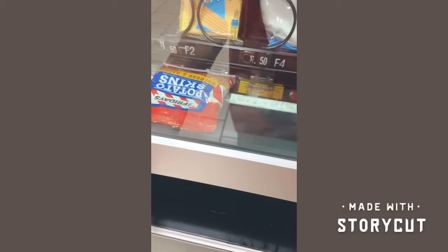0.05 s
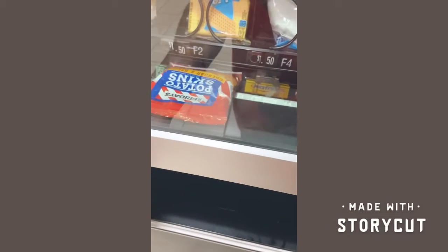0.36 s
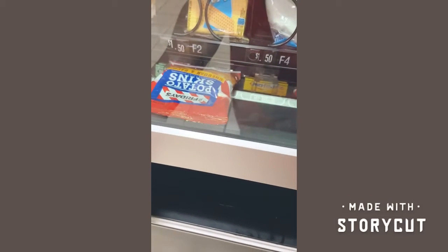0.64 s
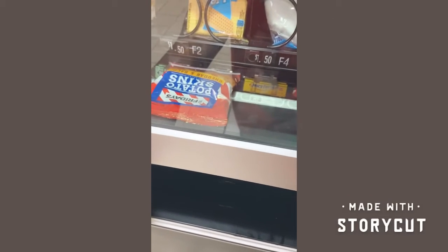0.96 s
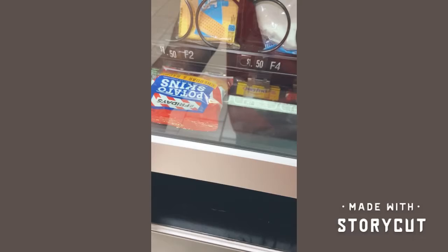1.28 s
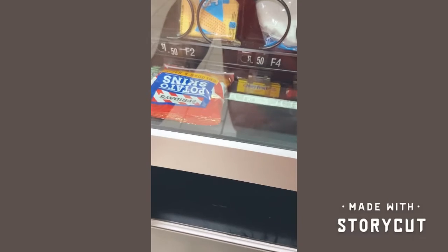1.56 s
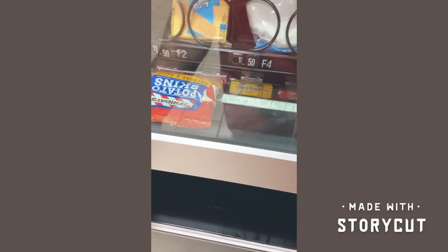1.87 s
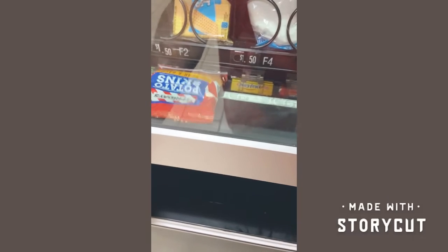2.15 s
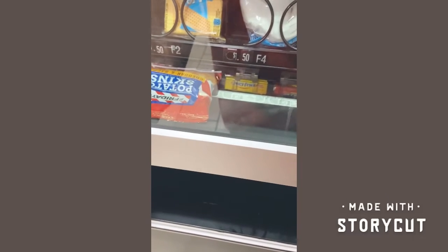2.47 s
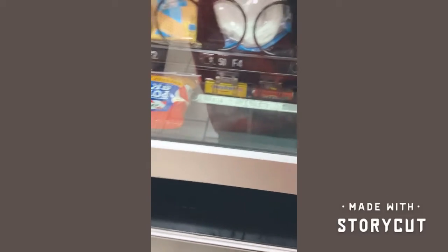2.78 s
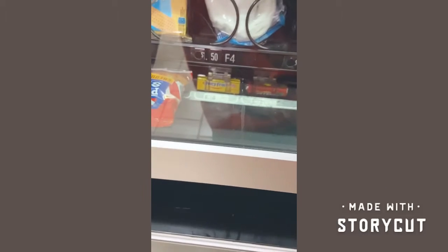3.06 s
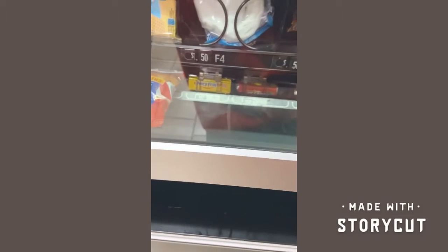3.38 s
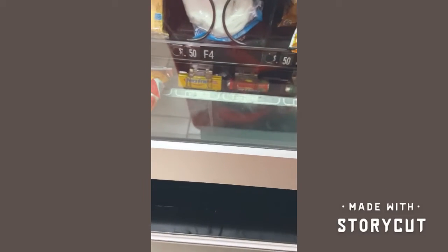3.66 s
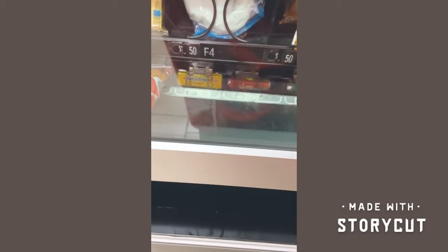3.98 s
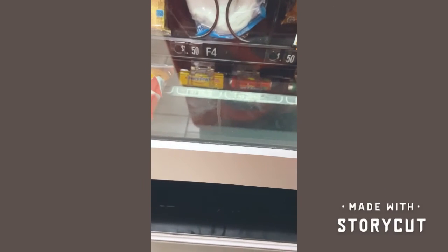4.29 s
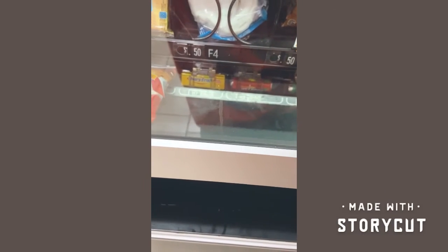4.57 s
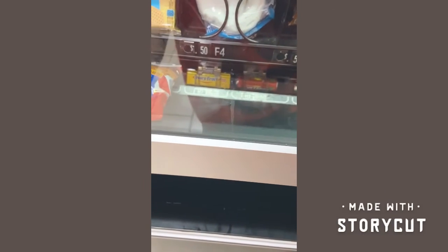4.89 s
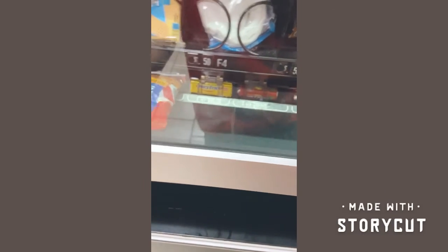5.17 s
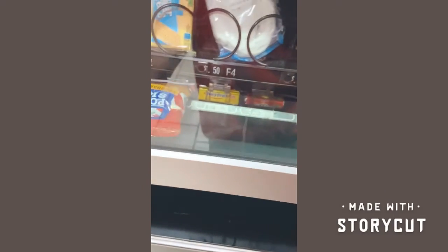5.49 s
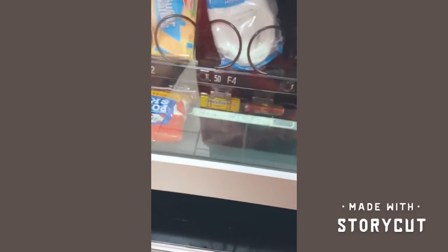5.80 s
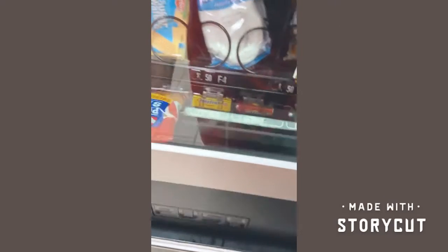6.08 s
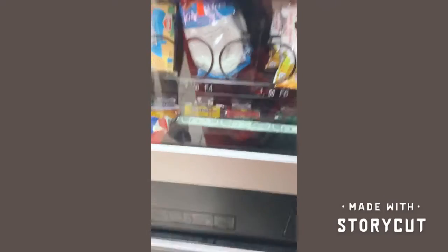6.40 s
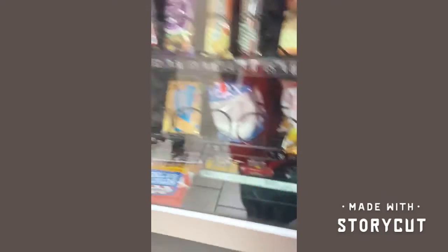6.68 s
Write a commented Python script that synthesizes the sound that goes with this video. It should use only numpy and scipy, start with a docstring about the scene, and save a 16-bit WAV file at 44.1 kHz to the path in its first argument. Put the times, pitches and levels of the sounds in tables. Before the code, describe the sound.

A snack vending machine hums steadily close to the microphone. Its delivery flap is shoved three times, each push rumbling the steel cabinet and ending in a hollow slam and rebound. Light knocks and short, shrill hinge squeaks fall in between. After a quieter stretch, four quicker shoves follow, the last booming in the bin with a faint wire ring. The hum eases under a soft handling rumble.

```python
"""A snack vending machine hums; its delivery flap is shoved three times (0.2-2.3 s), close to the mic.
Each shove rumbles the steel cabinet, scrapes the flap, slams it against its stop and lets it rebound.
In between, the loose flap knocks lightly and the dry hinge squeals and creaks.
Four quicker shoves follow (5.2-6.4 s); the last booms in the bin and leaves a wire spiral singing.
The hum fades at the end as the mic is lifted away with a soft rumble."""
import sys
import numpy as np
from scipy import signal
from scipy.fft import rfft, irfft, next_fast_len
from scipy.io import wavfile
from scipy.ndimage import uniform_filter1d

SR = 44100
rng = np.random.default_rng(int(sys.argv[2]) if len(sys.argv) > 2 else 0)


def unload_audio(sound):
    """Save the sound as a 16-bit wav file, at the path given as the first command line argument."""
    columns = np.transpose(np.atleast_2d(sound))
    # keep every value between -1 and 1, then stretch to whole-number steps
    steps = np.round(np.clip(columns, -1, 1) * 32767)
    wavfile.write(sys.argv[1], SR, steps.astype(np.int16))


N = 306230
TIME_S = np.arange(N) / SR
FFT_SIZE = next_fast_len(N + SR)
FREQ_HZ = np.fft.rfftfreq(FFT_SIZE, 1 / SR)
QUADRATURE_RAD = np.array([[0], [np.pi / 2]])

# flap shoves (push [s], slam [s], rebound [s], push [dB], scrape [dB], slam [dB], rebound [dB], thud [dB], snap
# [dB], crack [dB], slam hold [s], slam spot [Hz], rebound spot [Hz])
SHOVES = [(0.22, 0.4525, 0.517, -29.5, -48.5, -6, -12, -1, -0.5, 0, 0.014, 923, 1930),
          (1.412, 1.6291, 1.689, -30.5, -44, -11, -15.5, 1, -0.5, 0, 0.022, 1115, 2780),
          (2.115, 2.272, 2.34, -30, -49.5, -9.5, -15.5, -1, -0.5, 1, 0.014, 2670, 1500),
          (5.237, 5.328, 5.406, -24, -30, -8.5, -21.5, -0.5, 0.5, 2, 0.011, 1320, 2510),
          (5.575, 5.669, 5.745, -28, -27, -7.5, -27.5, 0, -1.5, 2.5, 0.012, 1600, 2700),
          (5.876, 5.944, 6.026, -30, -31, -10.5, -29.5, -0.5, -2, 1.5, 0.013, 3550, 2500),
          (6.269, 6.325, 6.369, -43.5, -33.5, -14, -17.5, -5, -0.5, 10.5, .012, 3570, 3550)]


def flap():
    """Blows and dragging drive deep cabinet modes, the flap's modes and a bright crack in the trim."""
    # resonances (frequency [Hz], width [Hz], level [dB])
    cabinet_modes = [(69, 36, -10.5), (112.4, 12, -1), (160.3, 24, -3), (217, 34, 1), (241, 36, -1.5),
                     (260.5, 28, -2.5), (306, 17, -9.5)]
    flap_modes = [(554, 35, -5), (684, 40, 2), (790, 50, -6), (860, 60, 1), (930, 50, -5), (1190, 70, -3),
                  (1380, 100, 4), (1540, 70, -1), (1760, 60, -7), (1965, 70, 4), (2150, 50, -6),
                  (2490, 80, -2), (2720, 100, 2), (3130, 75, -0.5)]
    trim_modes = [(3590, 250, 6), (4060, 110, 4.5), (4700, 120, 6.5), (4920, 130, 10), (5260, 150, 11),
                  (5745, 220, 11), (6150, 100, 6), (6260, 70, 7.5), (8400, 250, 5), (9250, 320, 0.5)]
    # broad spectra of flap and trim (frequency [Hz], level [dB])
    clack_spectrum = [(250, -24), (470, -13), (660, 0), (1000, -1), (1400, -3), (2300, -0.5), (3200, -1),
                      (4000, -16), (6000, -43.5)]
    crack_spectrum = [(1500, -95.5), (2900, -51.5), (3500, 0.5), (4400, 2), (5700, 5), (6500, 3.5),
                      (7200, 2), (8400, 4.5), (9600, -5.5), (14000, -43.5)]
    thud, clack, snap, crack = flap_forces()
    # big panels follow only slow forces
    heavy = colour([(25, -21), (60, 4.5), (300, -4.5), (450, -16), (1000, -35.5)])
    cabinet = ringing(cabinet_modes) * heavy
    flap_peaks = abs(ringing(flap_modes)) * amp(curve([(250, -20), (500, 0), (3200, 0), (6000, -18)]))
    plate = causal(np.hypot(flap_peaks, amp(curve(clack_spectrum))))
    trim_peaks = abs(ringing(trim_modes)) * amp(curve([(2000, -38.5), (3400, -4)]))
    trim = causal(np.hypot(trim_peaks, amp(curve(crack_spectrum))))
    soft = 1 / (1 + (FREQ_HZ / 1600) ** 10)  # soft blows reach only the lower modes
    plate_sound = through(clack, unit(plate * soft)) + through(snap, unit(plate * (1 - soft)))
    return through(thud, unit(cabinet)) + plate_sound + through(crack, unit(trim))


def flap_forces():
    """Push, swing, slam and rebound of each shove, plus light knocks, in four force bands."""
    # loose flap knocks (time [s], level [dB], thud [dB], snap [dB], crack [dB], spot [Hz], rise [s])
    knocks = [(0.149, -52, -4, -3, 2.5, 3600, .003), (0.2, -40, 7.5, -9, 1, 660, .007),
              (0.378, -42, -7.5, 2.5, -3, 2300, .007), (0.668, -35.5, 4, -2, -2, 680, 0.011),
              (0.705, -29, 0, -5.5, -6.5, 1320, .009), (0.789, -34, 2, -4, -3.5, 1960, 0.0095),
              (1.74, -29.5, -6.5, -8, -16, 1350, .006), (1.812, -39, -1, -4, -8, 1710, .006),
              (1.9, -37, 4.5, -4.5, -3, 900, .007), (2.205, -43.5, 0, -1, -10, 1960, .007),
              (2.455, -35.5, 4, -3.5, -7.5, 1490, 0.0076), (2.51, -43, -2.5, -4, -9, 1490, 0.0064),
              (2.61, -41.5, 5, -9, -16, 580, .007), (2.725, -47.5, 9.5, -5, -3, 1380, .007),
              (2.812, -27.5, -2, -0.5, -11, 1830, .004), (2.877, -32, 1, -20, -17, 860, .003),
              (3.875, -40, -2, -0.5, -3.5, 1100, .004), (3.905, -42, -2, -3.5, -6, 1290, .007),
              (3.975, -46, -1, -3, -11, 1000, .006), (4.295, -38.5, -3.5, -16, -8, 990, 0.0077),
              (4.58, -46, 7.5, -15, -12, 900, .012), (4.76, -52, -8, 2.5, 12.5, 3480, .004),
              (5.208, -45, 9, -9, -1, 900, .012), (5.474, -43.5, 2.5, -5, 15.5, 3700, .003),
              (5.538, -37.5, 6, -1, 5, 680, .003), (5.579, -28, -3, -2.5, 1.5, 700, .002),
              (5.626, -28, -1, -5, 3, 2740, 0.0053), (6.085, -46, 3.5, -4, 11.5, 3700, .004),
              (6.125, -36.5, 1, -3.5, 1.5, 1140, 0.0076), (6.161, -31.5, -1, -3, -0.5, 634, 0.0088),
              (6.228, -47.5, 5, -1, 4.5, 5350, .003), (6.414, -29.5, -6, 3, 9, 3320, 0.0033),
              (6.594, -33, -5, -3.5, 8, 550, .002), (6.609, -35, -3.5, -2, -1, 795, .005),
              (6.685, -41, -1.5, -1, 4, 550, .002), (6.754, -37.5, -20, -1.5, 4, 2300, .002)]
    push = dict(spot_hz=670, rise_s=0.0089, hold_s=0.004, t60_s=0.2, thud_db=6.5, crack_db=1)
    slam = dict(rise_s=0.002, t60_s=0.073, thud_db=-4, crack_db=-1.5, thud_delay_s=0.004)
    rebound = dict(rise_s=0.01, hold_s=0.011, t60_s=0.087, thud_db=-1.5, crack_db=-3)
    knock = dict(hold_s=0.0045, t60_s=0.14, thud_db=5.5, crack_db=-1)
    force = np.zeros((4, 2, N))
    for (push_s, slam_s, rebound_s, push_db, scrape_db, slam_db, rebound_db,
         *tone_db, slam_hold_s, slam_hz, rebound_hz) in SHOVES:
        add(force, push_s, blow(push_db, tone_db, **push))
        add(force, *swing(push_s, slam_s, scrape_db, thud_db=tone_db[0]))
        add(force, slam_s, blow(slam_db, tone_db, slam_hz, hold_s=slam_hold_s, **slam))
        add(force, rebound_s, blow(rebound_db, tone_db, rebound_hz, **rebound))
    for start_s, db, *tone_db, spot_hz, rise_s in knocks:
        add(force, start_s, blow(db, tone_db, spot_hz, rise_s, **knock))
    return force


def blow(db, tone_db, spot_hz, rise_s, hold_s, t60_s, thud_db, crack_db, thud_delay_s=0):
    """Force of one blow as thud, clack, snap and crack (low to high), favouring the struck spot's ring."""
    spot_db, spot_width_hz = 5, 190
    t = np.arange(SR // 3) / SR
    thud_age = np.maximum(t - thud_delay_s, 0) / 1.69  # the heavy cabinet responds more slowly
    age = np.array([thud_age, t, t, t])[:, None]
    envelope = np.minimum(age / rise_s, 1) * amp(db - 60 * np.maximum(age - hold_s, 0) / t60_s)
    thud, snap, crack = tone_db
    shares = amp([thud_db + thud, -0.8, snap - 0.4, crack_db + crack])
    force = shares[:, None, None] * envelope * chatter(t, grain_db=3.5)
    spot = signal.lfilter(*signal.iirpeak(spot_hz, spot_hz / spot_width_hz, fs=SR), force)
    return force + (amp(spot_db) - 1) * spot


def swing(push_s, slam_s, scrape_db, thud_db):
    """Start and force of a swing: the flap scrapes, the cabinet rumbles, loose goods rattle."""
    brush_s, free_s = 0.03, 0.012  # hand contact before the push; free flight before the slam
    settle_s, settle_db_per_s = 0.62, 11
    swell_db, fade_db_per_s = 5.5, 105  # the scrape grows with speed, dies after the slam
    travel_s = slam_s - push_s
    t = np.arange(-brush_s, travel_s + settle_s, 1 / SR)
    after_s = np.maximum(t - travel_s, 0)
    contact = np.interp(t, [t[0], 0, t[-1] - 0.05, t[-1]], [0, 1, 1, 0]) ** 2
    rumble = amp(-38 + thud_db - settle_db_per_s * after_s)
    scrape = amp(scrape_db + swell_db * np.minimum(t / travel_s, 1) - fade_db_per_s * after_s)
    scrape *= amp(np.interp(t - travel_s, [-2 * free_s, -free_s, 0, free_s], [0, -4, -4, 0]))
    envelopes = np.array([rumble, scrape * amp(-7), scrape * amp(-8), scrape * amp(-8.5)])
    drag = envelopes[:, None] * chatter(t, grain_db=2.5)
    drag[1:] *= unit(amp(3.5 * drift(len(t), rate_hz=130)))  # stick-slip spurts
    ticks = rumble * amp(-10) * loose_goods(t) * chatter(t, grain_db=2.5)
    rattle = np.array([0, 1, amp(-7.5), amp(-10)])[:, None, None] * ticks
    return push_s - brush_s, (drag + rattle) * contact


def chatter(t, grain_db):
    """Loose parts strike each other many times: dense clicks of uneven size."""
    sizes = amp(grain_db * drift(len(t), 900))
    return unit(sizes * rng.standard_normal((2, 2 * SR))[:, :len(t)])


def loose_goods(t, ticks_per_s=55, decay_s=0.0036, spread_db=13):
    """Envelope of short contacts of uneven size at random moments."""
    chance, size = rng.random((2, 2 * SR))[:, :len(t)]
    impulses = (chance < ticks_per_s / SR) * amp(spread_db * size)
    return unit(signal.lfilter([1], [1, -np.exp(-1 / (decay_s * SR))], impulses))


def panel_ring(rise_s=0.006, spread_db=1.5):
    """Each slam rings the flap and front panel: a hollow clack with a thin metallic tail."""
    # panel modes (frequency [Hz], level re slam [dB], t60 [s])
    modes = [(553, -16.5, .2), (683, -11, 0.15), (940, -18, 0.14), (655, -20, 0.38), (867, -12.5, .14),
             (1232, -16.5, .4), (1378, -7.5, 0.14), (1554, -13.5, .22), (1954, -10, 0.14),
             (2060, -25.5, 0.45), (2172, -22, .35), (2470, -17.5, 0.37), (2730, -13.5, 0.14),
             (3120, -17.5, .26), (4760, -23.5, .2)]
    sound, t = np.zeros((2, N)), np.arange(SR // 2) / SR
    attack = np.minimum(t / rise_s, 1)
    for _, slam_s, _, _, _, slam_db, *_ in SHOVES:
        for hz, db, t60_s in modes:
            decay = amp(slam_db + db + spread_db * rng.standard_normal() - 60 * t / t60_s)
            phase = 2 * np.pi * (hz * t + rng.random((2, 1)))
            add(sound, slam_s, attack * decay * np.sin(phase))
    return sound


def panel_bumps():
    """A firm push or slam flexes a broad steel panel, which answers with one rounded bump."""
    # flexes (time [s], pitch [Hz], level [dB], swell [s])
    flexes = [(0.222, 278, -24.5, 0.015), (0.453, 256, -23, 0.024), (0.458, 146, -24, .016),
              (0.685, 247.6, -24, .02), (0.785, 276.6, -27.5, .022), (1.411, 255.4, -26, .018),
              (1.632, 229, -12, .017), (2.112, 289, -26.5, 0.022), (2.272, 216, -22, 0.019),
              (5.234, 269.3, -20.5, 0.026), (5.329, 248.4, -19.5, .02), (5.574, 277, -22, 0.016),
              (5.668, 217.4, -19, 0.018), (5.875, 236, -24, .016), (5.945, 257, -18, 0.016),
              (6.18, 168, -25.5, .015), (6.326, 308, -22.5, .01), (6.372, 161, -19.5, 0.02),
              (6.374, 56.3, -23, .012)]
    sound, t = np.zeros((2, N)), np.arange(SR // 3) / SR
    for start_s, hz, db, swell_s in flexes:
        age = t / swell_s
        add(sound, start_s, amp(db) * age * np.exp(1 - age) * np.sin(2 * np.pi * hz * t))
    return sound


def bin_boom():
    """The air and sheet metal of the hollow bin take up the last slam and its rebound."""
    # blows to the bin (time [s], level [dB], t60 [s])
    booms = [(6.329, -12.5, 0.2), (6.369, -9.5, 0.084)]
    # bin modes (frequency [Hz], width [Hz], level [dB])
    modes = [(58, 30, -8), (162, 28, 6), (268, 42, -2.5), (332, 33, 4.5), (374, 27, -5), (566, 150, -3.5)]
    force, t = np.zeros((2, N)), np.arange(SR // 3) / SR
    for start_s, db, t60_s in booms:
        add(force, start_s, amp(db - 60 * t / t60_s) * chatter(t, grain_db=4))
    body = ringing(modes) * colour([(20, -13), (50, 4), (550, 0), (1200, -20)])
    return through(force, unit(body))


def wire_spiral(start_s=6.375, hz=2350, db=-38, t60_s=0.9):
    """The last slam leaves a wire spiral singing."""
    t = np.maximum(TIME_S - start_s, 0)
    return amp(db - 60 * t / t60_s) * np.sin(2 * np.pi * hz * t)


def hinge_squeals():
    """Stick and slip: a thin gliding tone that turns to a scrape when the slips are uneven."""
    # (time [s], length [s], pitch [Hz], glide [Hz], jitter [Hz], roughness [0-1], level [dB])
    squeals = [(0.289, 0.13, 9620, -380, 65, 0.23, -31), (0.38, 0.12, 9570, 352, 76, 0.27, -31),
               (0.908, 0.054, 4290, 0, 30, .35, -30), (0.912, 0.04, 9205, 0, 30, 0, -25.5),
               (0.921, 0.031, 5110, -60, 50, .25, -26), (1.48, 0.11, 9600, -350, 80, 0.4, -32),
               (1.553, 0.034, 4180, -58, 30.4, 0, -28.5), (1.995, 0.046, 4340, -2, 35, 0.32, -30),
               (2.0, 0.057, 9270, 60, 55, .5, -29.5), (2.141, 0.076, 9640, 0, 36, 0, -38.5),
               (2.199, 0.024, 4300, 4, 30.1, .3, -43.5), (3.547, 0.05, 4990, 50, 40, 0.27, -28),
               (3.55, 0.049, 9507, -1, 25, .25, -40), (3.547, 0.072, 870, -12, 12, .3, -43),
               (3.555, 0.055, 1640, 2, 30, .4, -52), (5.252, 0.075, 2080, -260, 130, .8, -21),
               (5.902, 0.042, 2590, -120, 90, .8, -34)]
    sound = np.zeros((2, N))
    for start_s, length_s, hz, glide_hz, jitter_hz, rough, db in squeals:
        envelope = hinge_grip(length_s, db)
        count = len(envelope)
        pitch_hz = hz + glide_hz * np.linspace(-0.5, 0.5, count) + jitter_hz * drift(count, 700)
        phase = 2 * np.pi * np.cumsum(pitch_hz) / SR + QUADRATURE_RAD
        uneven = unit(1 - rough + rough * (drift(count, 350) + 1j * drift(count, 350)))
        add(sound, start_s, envelope * np.sqrt(2) * (uneven * np.exp(1j * phase)).imag)
    return sound


def hinge_creaks(rasp_db=-6, fade_db=11):
    """Irregular slips bite hard and ease off, ringing the hinge's modes over a dry rasp."""
    # (time [s], length [s], level [dB], main mode [Hz], width [Hz], side modes re level [dB])
    creaks = [(0.912, 0.068, -30.5, 4860, 180, -3), (1.996, 0.085, -30.5, 5000, 200, -2),
              (3.546, 0.076, -35.5, 5050, 200, -1.5)]
    # hinge side modes (frequency [Hz], width [Hz], level [dB])
    side_modes = [(3590, 50, -8), (4070, 50, -2), (4320, 70, 3), (4785, 50, 1), (5410, 60, -5),
                  (5650, 90, -6), (8480, 80, -3.5), (8600, 80, -4), (8900, 80, -4), (9200, 110, 0),
                  (9400, 60, -4)]
    # dry friction (frequency [Hz], level [dB])
    rasp_spectrum = [(2500, -15), (3800, -14), (4300, -18), (5100, -8), (5700, -0.5), (6400, -15),
                     (7300, -20.5), (8400, 6), (9500, -9), (12000, -17.5)]
    rasp = amp(rasp_db) * unit(colour(rasp_spectrum))
    side = unit(ringing(side_modes))
    sound = np.zeros((2, N))
    for start_s, length_s, db, hz, width_hz, side_db in creaks:
        envelope = hinge_grip(length_s, db)
        envelope *= amp(fade_db * np.linspace(0.5, -0.5, len(envelope)))
        slips = np.zeros((2, N))
        add(slips, start_s, envelope * rng.standard_normal((2, SR // 4))[:, :len(envelope)])
        main = unit(ringing([(hz, width_hz, 0)]))
        sound += through(slips, main + rasp + amp(side_db) * side)
    return sound


def hinge_grip(length_s, db):
    """The hinge binds and lets go: an uneven swell."""
    count = int(length_s * SR)
    return amp(db + 2.2 * drift(count, 350)) * signal.windows.tukey(count, 0.85)


def machine_hum():
    """Wavering compressor and fan tones over the rush of moving air."""
    # compressor and fan tones (frequency [Hz], level [dB])
    partials = [(75.4, -54), (118.4, -46.5), (172.8, -52.5), (231, -53.5), (290.7, -56), (349.9, -42.5),
                (522.5, -63), (869, -67.5), (1744, -65.5), (2557, -68.5), (3311, -69.5), (3596, -72)]
    # mic's nearness to the tones (time [s], gain [dB])
    nearness = [(0, 0.5), (0.9, -1.5), (1.4, 0), (3.0, 1), (4.4, 0), (5.1, 2.5), (5.4, 0.5), (6.2, -1.5),
                (6.6, -3), (6.94, -6.5)]
    # moving air (frequency [Hz], density [dB/Hz])
    air_spectrum = [(20, -102), (42, -73.5), (65, -63), (100, -67), (140, -71), (200, -67), (255, -67),
                    (320, -73), (390, -73), (445, -79), (620, -78.5), (900, -85), (1350, -89),
                    (3400, -91.5), (4000, -94), (4800, -92), (6500, -100), (9600, -102)]
    tones = np.zeros((2, N))
    for hz, db in partials:
        phase = 2 * np.pi * np.cumsum(hz + 3 * drift(N, 45)) / SR + QUADRATURE_RAD
        flutter_db = 2.6 * drift(N, 40) + 3 * min(hz / 3000, 1) * drift(N, 2)
        tones += np.sqrt(2) * amp(db + flutter_db) * np.sin(phase)
    air = through(rng.standard_normal((2, N)), amp(curve(air_spectrum)) * np.sqrt(SR / 2))
    air *= amp(0.57 * drift(N, 8.2))
    return air + tones * amp(np.interp(TIME_S, *np.transpose(nearness)))


def mic_handling(hz=58, width_hz=32):
    """The hand rumbles softly on the mic as it is lifted."""
    # rumble envelope (time [s], level [dB])
    levels = [(5.9, -80), (6.15, -41), (6.4, -35), (6.7, -43), (6.94, -48)]
    rumble = through(rng.standard_normal((2, N)), unit(ringing([(hz, width_hz, 0)]) ** 2))
    return rumble * amp(np.interp(TIME_S, *np.transpose(levels)))


def room_tail(x, rise_s=0.0024):
    """A diffuse tail, each band dying at its own speed."""
    # room decay (frequency [Hz], t60 [s])
    decay_times = [(100, 0.93), (300, 0.73), (1000, 0.41), (2500, 0.37), (5000, 0.34), (10000, 0.21)]
    hz, t, bands = signal.stft(rng.standard_normal((2, SR)), SR, nperseg=256)
    bands = bands * amp(-60 * t / curve(decay_times, hz)[:, None]) * np.minimum(t / rise_s, 1)
    tail = signal.istft(bands, SR, nperseg=256)[1][:, :SR]
    return through(x, rfft(tail / np.linalg.norm(tail[0]), FFT_SIZE))


def level_dips(fall_s=0.095):
    """Gain that dips briefly after two shrill squeaks."""
    # (time [s], depth [dB], recovery [s])
    dips = [(0.937, 8.5, 0.11), (2.035, 1, 0.057)]
    return amp(sum(np.interp(TIME_S, [s, s + fall_s, s + fall_s + back_s], [0, -db, 0])
                   for s, db, back_s in dips))


def mic_ports(left, other):
    """Two ports: the right hears a blend of the left and a second signal, tilted and phase-shifted."""
    # likeness of the ports (frequency [Hz], coherence [0-1])
    likeness = [(300, 1), (700, 0.85), (1900, 1), (2500, 0.68), (3600, 0.54), (4500, 0.29), (5400, 0.71),
                (6200, 0.91), (6800, 1), (7800, 0.99), (9000, 0.88), (9800, 0.099)]
    # right port's excess (frequency [Hz], gain [dB])
    tilt = [(100, 0), (300, .8), (650, 2), (1000, 1.3), (1400, 0), (2300, 1.5), (3200, 0), (9000, 0)]
    # left port's lead (frequency [Hz], phase [rad])
    lead = [(2050, 0), (2400, .9), (3500, .9), (3800, .4), (4450, .9), (5000, .15), (6200, 1.9),
            (6700, 2.95), (7500, 3.15), (8150, 3.45), (9450, 5.5), (9800, 6.5)]
    coherence = curve(likeness)
    port = amp(curve(tilt)) * np.exp(-1j * curve(lead))
    right = through(left, coherence * port) + through(other, np.sqrt(1 - coherence ** 2) * port)
    return np.array([left, right])


def amp(db):
    """Decibels to gain."""
    return 10 ** (np.asarray(db) / 20)


def unit(x):
    """Scales to rms 1."""
    return x / np.sqrt(np.mean(abs(x) ** 2) + 1e-20)


def curve(points, hz=FREQ_HZ):
    """Interpolates a table on a log-frequency axis."""
    points_hz, values = np.transpose(points)
    return np.interp(np.log(hz + 1), np.log(points_hz + 1), values)


def drift(count, rate_hz):
    """Random wander: straight lines between Gaussian knots."""
    knots = rng.standard_normal(4096)
    return np.interp(np.arange(count) * rate_hz / SR % 4095, np.arange(4096), knots)


def add(mix, start_s, sound):
    """Mixes a sound in, in place."""
    part = mix[..., max(round(start_s * SR), 0):][..., :sound.shape[-1]]
    part += sound[..., :part.shape[-1]]


def through(x, response):
    """Filters by a frequency response."""
    return irfft(rfft(x, FFT_SIZE) * response, FFT_SIZE)[..., :N]


def causal(gain):
    """Minimum-phase response with the given gain per bin."""
    log_gain = np.log(gain)
    mirrored = np.concatenate([log_gain, log_gain[1:FFT_SIZE - len(FREQ_HZ) + 1][::-1]])
    return np.exp(np.conj(signal.hilbert(mirrored)))[:len(FREQ_HZ)]


def colour(points):
    """Causal response through (frequency [Hz], gain [dB]) points."""
    return causal(amp(curve(points)))


def ringing(modes):
    """Response of a set of damped resonances."""
    return sum(amp(db) * 1j * FREQ_HZ * width_hz / (hz ** 2 - FREQ_HZ ** 2 + 1j * FREQ_HZ * width_hz)
               for hz, width_hz, db in modes)


def scene():
    """Flap, hinge, room, hum and handling at the two mic ports."""
    impacts = flap() + panel_ring() + panel_bumps() + bin_boom() + wire_spiral()
    squeaks = hinge_squeals() + hinge_creaks()
    tail = room_tail(amp(-12.5) * impacts + amp(-19) * squeaks)
    mix = (impacts + squeaks + tail + machine_hum() + mic_handling()) * level_dips()
    return mic_ports(*mix)


def record(dry, threshold_db=-14.5, duck_db_per_db=0.56, ceiling=0.85, cutoff_hz=9680):
    """Gain control ducks after loud slams, peaks are rounded off, and the treble is cut."""
    power_db = 10 * np.log10(abs(uniform_filter1d((dry ** 2).mean(0), size=300)) + 1e-12)
    release_db = 43.5 * TIME_S  # the held peak falls at a steady rate
    held_db = np.maximum.accumulate(power_db + release_db) - release_db
    over_db = np.maximum(held_db - threshold_db, 0)
    ducked = dry / amp(duck_db_per_db * uniform_filter1d(over_db, size=150))
    lowpass = 1 / np.sqrt(1 + (FREQ_HZ / cutoff_hz) ** 100)
    return through(ceiling * np.tanh(ducked / ceiling), lowpass)


dry = scene()
out = record(dry)
unload_audio(out)
```